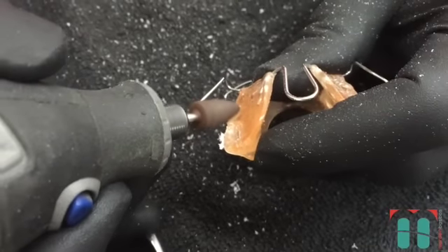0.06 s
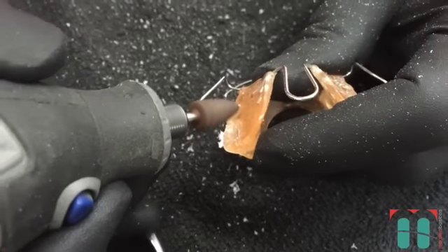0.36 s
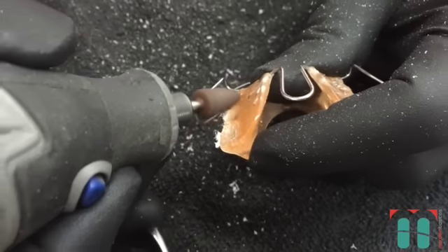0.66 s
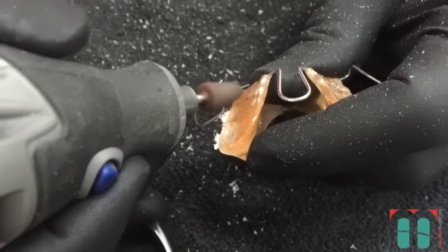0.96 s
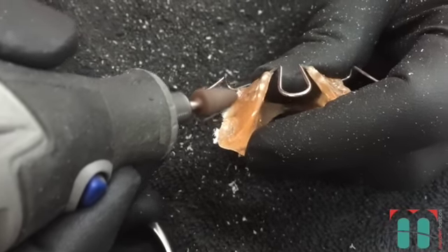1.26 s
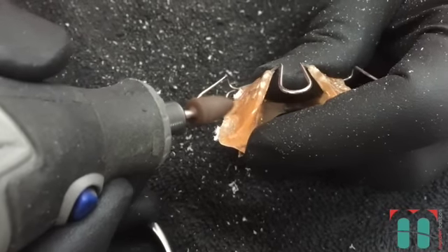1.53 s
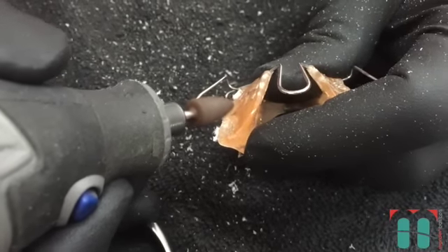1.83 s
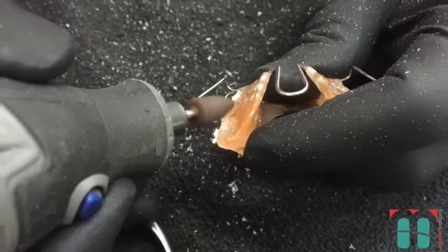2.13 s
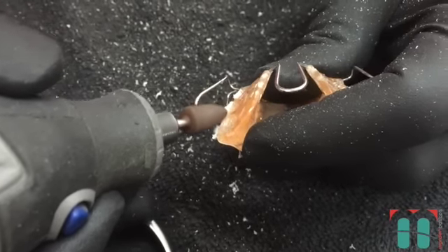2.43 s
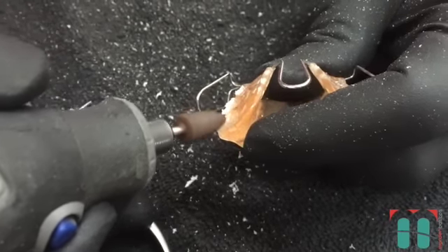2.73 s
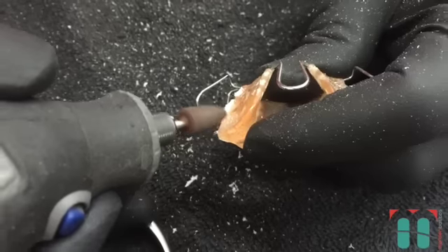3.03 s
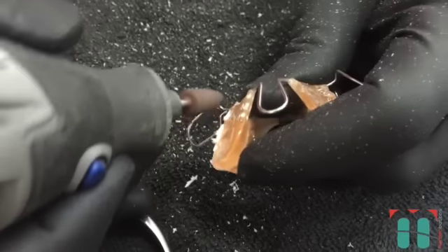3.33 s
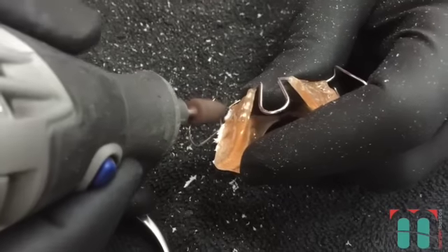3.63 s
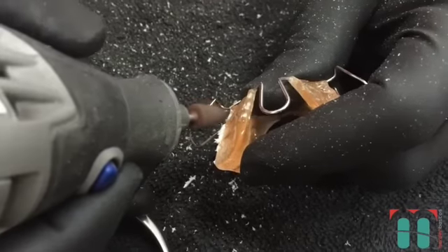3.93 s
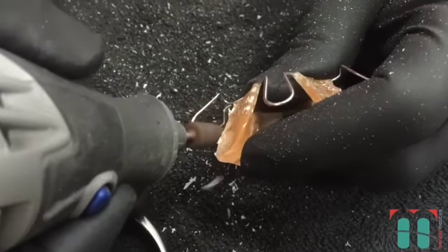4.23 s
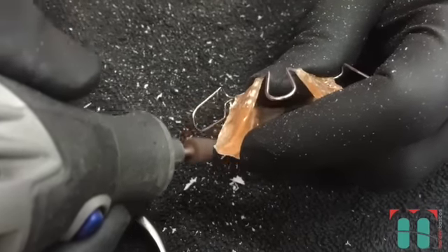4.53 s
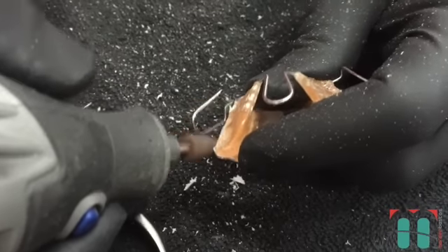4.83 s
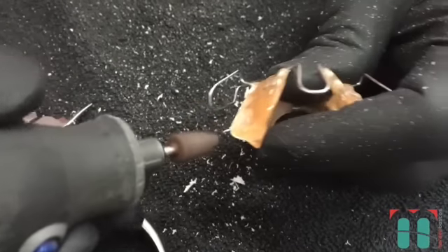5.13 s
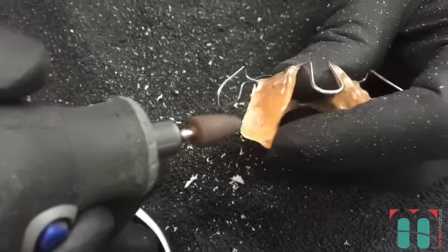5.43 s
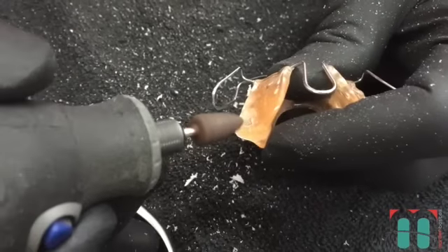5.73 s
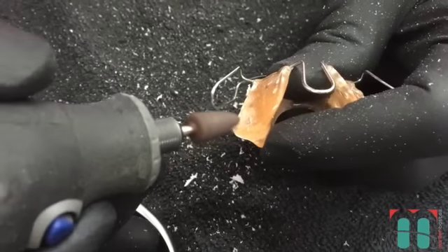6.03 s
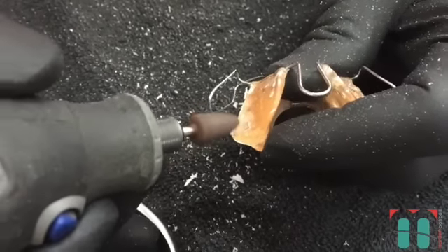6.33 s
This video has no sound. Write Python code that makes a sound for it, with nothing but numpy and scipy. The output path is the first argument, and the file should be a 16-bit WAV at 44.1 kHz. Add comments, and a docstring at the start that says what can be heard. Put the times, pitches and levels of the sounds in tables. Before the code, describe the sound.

A small rotary tool runs close to the microphone for the whole six and a half seconds: a high, steady whine with a motor buzz, a thin fan whistle and hissing air, its pitch sagging slightly under load. Its abrasive stone grinds a hard plastic plate with a gritty, rasping chatter. Quick, uneven presses follow one another through the first three seconds, with brief shrill squeals near 0.2, 1.1 and 1.8 seconds. From about 3.1 to 3.9 seconds the contact lightens to a brighter scrape. Firmer presses return from 4 to 5 seconds, with a cluster of piercing squeals. The grinding eases around 5.4 seconds while the motor keeps whining, then resumes, squealing briefly near 6 and 6.4 seconds. Soft, dull hand bumps come mostly in the last second or so. A faint, low room rumble lies behind the bench.

```python
"""A high, steady whine with a rasping chatter: a small rotary tool grinds a hard plastic plate on a
bench, close to the microphone. The shaft hums at about 29,000 rpm and sags under load, the fan whistles
and blows, and the mains supply makes the motor buzz. The stone strikes the plate once a turn, each press
ringing the modes of that place on the rim, and squeals where it grabs. The hands bump softly, and a
faint room rumble lies behind it all."""
import sys
import numpy as np
from scipy import signal
from scipy.fft import rfft, irfft, next_fast_len
from scipy.io import wavfile
from scipy.ndimage import uniform_filter1d, map_coordinates

SR = 44100
rng = np.random.default_rng(int(sys.argv[2]) if len(sys.argv) > 2 else 0)


def master_out(mix):
    """Clip the mix to full scale and print it as 16-bit PCM to the path in sys.argv[1]."""
    frames = np.transpose(np.atleast_2d(mix))
    ceiling = np.clip(frames, -1, 1)
    pcm = np.round(ceiling * 32767).astype(np.int16)
    wavfile.write(sys.argv[1], SR, pcm)


N = 289737

# Levels in the tables are relative: each source adds its own gain.
# the shaft's speed, sagging under load: (time [s], speed [turns/s])
SHAFT_SPEED = [(0, 475), (.46, 472), (.75, 479), (.98, 482), (1.48, 481.6), (1.85, 476.8), (2.3, 480.5),
               (2.6, 480), (3.3, 488.3), (3.65, 491.5), (3.88, 492), (4.15, 488.5), (4.42, 484.5),
               (4.75, 487), (4.92, 486), (5.3, 490), (5.63, 492), (6.13, 487.6), (6.57, 489.8)]
# hum of the shaft's imbalance: (time [s], level [dB])
SHAFT_HUM = [(0.0, -19), (0.13, -18.5), (1.28, -17.5), (1.35, -15.5), (1.81, -17.5), (3.46, -13.5),
             (3.88, -14), (4.32, -17.5), (4.63, -14.5), (4.87, -17), (5.03, -14), (5.36, -15.5),
             (6.57, -15.5)]
# whistle of the cooling fan's blades: (time [s], level [dB])
FAN_WHISTLE = [(0.0, -16), (1.13, -17), (1.81, -19), (2.1, -17), (3.22, -20.5), (3.44, -16.5),
               (3.68, -18.5), (4.54, -17.5), (4.61, -19), (4.9, -16), (5.07, -25), (5.27, -13),
               (5.53, -15.5), (6.57, -19)]
# side load shakes the housing at 2, 3 and 4 times the shaft's rate: (time [s], level [dB])
HOUSING_2ND = [(0.0, -19), (0.48, -17), (0.6, -32), (0.84, -22), (1.11, -20.5), (3.93, -24), (4.28, -19),
               (4.46, -24.5), (4.79, -20), (5.2, -24.5), (6.4, -22.5), (6.57, -26)]
HOUSING_3RD = [(0.0, -17), (0.03, -18.5), (0.42, -15.5), (0.55, -30), (0.58, -24.5), (0.93, -17),
               (1.9, -17.5), (2.18, -24), (2.25, -18), (3.75, -22), (4.1, -19.5), (4.3, -23), (5.49, -22),
               (6.13, -18), (6.22, -24.5), (6.33, -20), (6.57, -23)]
HOUSING_4TH = [(0, -36), (.4, -25), (.55, -26), (.65, -31), (1.2, -44), (1.78, -39), (1.89, -22),
               (1.99, -40), (2.3, -27.5), (2.95, -26), (3.75, -25), (3.92, -35), (4.18, -23), (4.38, -36),
               (4.55, -25), (6.57, -24.5)]
# tones of the supply ripple beside the shaft orders: (order, lower tone [dB], upper tone [dB])
RIPPLE_SIDEBANDS = [(1, -49.5, -43.5), (2, -30.5, -41.5), (3, -33.5, -28), (4, -43, -33.5), (5, -35, -30.5),
                    (6, -34.5, -62), (7, -37, -33.5), (9, -33, -31), (12, -30, -38.5), (13, -27, -30),
                    (14, -26, -57), (19, -43, -38)]
# the hand presses the stone on: (start [s], end [s], force [dB], place on the rim [wavelengths])
HAND_PRESSES = [(0, 0.093, 0, 1), (.15, .23, 2, 0.35), (.27, 0.427, 6, 0.25), (.42, 0.575, 5.5, 0.19),
                (.62, 0.696, 1, 0.43), (0.732, 0.92, 3, .36), (0.956, 1.135, 2.5, .21),
                (1.16, 1.27, 1.5, .22), (1.29, 1.39, -2.5, 0.68), (1.403, 1.595, 2, 0.44),
                (1.607, 1.82, -2.5, .61), (1.82, 1.9, 2, 0.9), (1.89, 1.98, 4.5, .42),
                (2.03, 2.185, 1.5, 0.21), (2.22, 2.3, 3.5, .42), (2.297, 2.455, -1, 0.84),
                (2.487, 2.61, -4.5, 0.95), (2.677, 2.71, 0, .1), (2.817, 2.927, 0, 0.35),
                (2.914, 3.033, 1.5, 0.49), (3.06, 3.105, 3, 0.17), (3.93, 4.085, 3.5, .46),
                (4.084, 4.342, 2.5, 0.96), (4.32, 4.515, 1.2, .74), (4.53, 4.73, -2.5, 0.93),
                (4.73, 4.85, 0, 1), (4.87, 4.916, -0.5, .71), (4.93, 4.987, -4.5, .99),
                (5.556, 5.76, -1.5, 0.76), (5.77, 5.95, 1, 0.75), (5.964, 6.19, -1.3, 0.89),
                (6.292, 6.41, -2.5, .75)]
# the plate's modes: (frequency [Hz], width [Hz], level [dB], antinode on the rim [wavelengths])
PLATE_MODES = [(2427, 166, -23, 0.013), (2887, 184, -27, 0.3), (3390, 360, -25.5, 0.73)]
# the stone's face rubs the plastic: (time [s], rasp [dB], scrape [dB])
RUB_LEVELS = [(0, -25, -27), (.2, -23.5, -22), (.55, -31.5, -26), (.85, -25, -20.5), (1.8, -22, -21),
              (2.1, -25.5, -25), (2.7, -24.5, -29), (3.2, -29, -18.5), (3.7, -23.5, -16),
              (4.15, -29, -23.5), (4.35, -23, -27), (4.7, -25, -19.5), (5.1, -24, -18.5), (5.45, -31, -33),
              (6.0, -25.5, -22.5), (6.57, -25, -25)]
# the plate's dense upper modes, a rasp and a brighter scrape: (frequency [Hz], level [dB])
RASP_SPECTRUM = [(3400, -6), (3850, 11.5), (4350, 8.5), (4850, 6), (5400, -30)]
SCRAPE_SPECTRUM = [(4900, -42), (5350, -6), (5750, 1.5), (6300, -2.5), (7200, -11), (7850, -11),
                   (8300, -15), (8700, -29), (9300, -11), (12000, -23)]
# the stone grabs and squeals: (centre time [s], length [s], frequency [Hz], width [Hz], level [dB])
STONE_GRABS = [(.19, .07, 5690, 400, -18), (1.11, .1, 13000, 3500, -27), (1.65, .2, 12300, 2500, -26),
               (1.8, .09, 12200, 2000, -21), (1.8, .12, 5730, 400, -22), (4.02, .15, 12500, 4000, -28),
               (4.18, 0.17, 13680, 1000, -21), (4.286, .06, 12400, 4000, -16), (4.44, .1, 15050, 700, -26),
               (4.446, 0.11, 12360, 2000, -19), (4.76, .13, 12200, 1400, -27),
               (4.875, 0.041, 5820, 400, -15), (4.89, .05, 12500, 4500, -17), (6.0, .25, 12000, 2000, -27),
               (6.373, .07, 5850, 900, -17.5)]
# broad hiss around the tool: (time [s], cooling air [dB], abrasion [dB])
HISS_LEVELS = [(0, -18, -21), (.6, -20, -23.5), (.85, -19, -21.5), (1.65, -19, -22.5), (2.65, -17.5, -22),
               (3.35, -18, -22), (4.3, -19, -21.5), (4.55, -19, -22.7), (5.3, -18.5, -23),
               (6.57, -18, -21.5)]
# air from the vents and scratching grit: (frequency [Hz], level [dB])
AIR_SPECTRUM = [(100, -33.5), (260, -21), (520, -12.5), (740, -13), (950, -5.5), (2300, -4.5), (3100, -7),
                (5200, -9), (6400, -1.5), (8200, -3), (9200, -12), (10400, -10.5), (15200, -31)]
GRIT_SPECTRUM = [(1000, -23.5), (3000, -7.5), (5800, -2), (9000, -1), (9900, 0), (10450, -8), (11300, -1.5),
                 (13000, -3), (15200, -3)]
# soft bumps of the hands: (time [s], level [dB])
HAND_BUMPS = [(0.909, -37), (5.369, -32), (5.649, -33), (5.689, -31), (6.319, -23), (6.399, -29),
              (6.479, -24)]
# low rumble of the room behind the tool: (frequency [Hz], level [dB])
ROOM_SPECTRUM = [(20, -24), (45, -9), (70, 3), (130, -1), (250, -2), (600, -24), (2000, -60)]


def motor(angle, shaft_db=3, fan_db=4, blades=18):
    """Close up, imbalance hums once a turn, the housing adds overtones and the fan's blades whistle."""
    out = amp(curves(SHAFT_HUM)[0] + shaft_db) * tone(angle, flutter_db=0.28, drift_rad=0.01)
    out += amp(curves(FAN_WHISTLE)[0] + fan_db) * tone(blades * angle, flutter_db=0.88, drift_rad=0.12)
    for order, levels, gain_db in [(2, HOUSING_2ND, 3), (3, HOUSING_3RD, 4.5), (4, HOUSING_4TH, 3.5)]:
        out += amp(curves(levels)[0] + gain_db) * tone(order * angle, flutter_db=0.83, drift_rad=0.028)
    return out


def mains_buzz(angle, ripple_hz=119.8, flutter_db=0.31):
    """The torque pulses twice a mains cycle and flanks shaft orders with pairs of tones."""
    ripple = 2 * np.pi * ripple_hz * np.arange(N) / SR
    out = np.zeros(N)
    for order, lower_db, upper_db in RIPPLE_SIDEBANDS:
        for side, db in ((-1, lower_db), (1, upper_db)):
            out += amp(db) * np.sin(order * angle + side * ripple + rng.uniform(0, 2 * np.pi))
    return out * amp(flutter_db * wobble(8))


def plate_chatter(turns, rasp_exponent=0.72, scrape_exponent=0.29, tremble_db=1.2, bite_db=0.9):
    """The strikes ring the plate; which modes answer depends on where the stone presses."""
    blows = stone_strikes(turns, jitter_turns=0.005, wander_turns=0.01, spread_db=1.8)
    bite = amp(bite_db * wobble(35))
    force = contact_force()
    rasp_db, scrape_db = curves(RUB_LEVELS)
    out = np.zeros(N)
    for hz, width, db, antinode in PLATE_MODES:
        drive = amp(db + tremble_db * wobble(22)) * contact_force(antinode)
        out += drive * resonate(blows, hz, width)
    out += amp(rasp_db) * force ** rasp_exponent * dense_modes(blows, RASP_SPECTRUM)
    out += amp(scrape_db) * force ** scrape_exponent * dense_modes(blows, SCRAPE_SPECTRUM)
    return bite * out


def stone_strikes(turns, jitter_turns, wander_turns, spread_db):
    """One impulse a turn, where the stone's high spot meets the plate; the contact point creeps."""
    whole_turns = np.arange(1, int(turns[-1]))
    timing, size = rng.standard_normal((len(whole_turns), 2)).T
    contact = turns + wander_turns * wobble(25)
    at = np.interp(whole_turns + jitter_turns * timing, contact, np.arange(N))
    # a windowed sinc places each strike between samples
    taps = at.astype(int)[:, None] + np.arange(-7, 9)
    offset = taps - at[:, None]
    pulses = np.sinc(offset) * np.cos(np.pi * offset / 16) ** 2
    pulses *= amp(spread_db * size[:, None])
    return np.bincount(np.clip(taps, 0, N - 1).ravel(), pulses.ravel(), N)


def contact_force(antinode=None, catch_s=0.018, release_s=0.03, graze_db=-7, mode_shape_db=3.5):
    """Each press catches, holds and eases to a graze; a mode feels it most at its antinode."""
    t = np.arange(N) / SR
    force = np.full(N, amp(graze_db))
    for start, end, db, place in HAND_PRESSES:
        if antinode is not None:
            db = db + mode_shape_db * np.cos(2 * np.pi * (place - antinode))
        held = np.clip(np.minimum((t - start) / catch_s, (end - t) / release_s) + 0.5, 0, 1)
        force = np.maximum(force, amp(db) * held)
    return force


def dense_modes(blows, spectrum):
    """Many close modes at a steady total level: the strongest overtone changes as the stone moves."""
    paths = sum(wobble(9) * unit(scatter(blows, t60=0.005)) for _ in range(6))
    ring = coloured(paths, spectrum)
    power = np.abs(uniform_filter1d(ring ** 2, SR // 20))
    return ring / np.sqrt(power + 1e-6)


def scatter(x, t60):
    """Short reflections between hands, plate and bench smear each impact."""
    t = np.arange(SR // 20) / SR
    reflections = rng.standard_normal(len(t)) * amp(-60 * t / t60)
    return signal.fftconvolve(x, reflections)[:N]


def stone_squeals(turns):
    """Where the stone grabs, every turn kicks the same shrill resonance for a moment."""
    t = np.arange(N) / SR
    slips = stone_strikes(turns, jitter_turns=0.003, wander_turns=0.005, spread_db=2.5)
    out = np.zeros(N)
    for centre, length, hz, width, db in STONE_GRABS:
        grip = np.exp(-((t - centre) / (length / 2)) ** 4 / 2)
        out += amp(db) * grip * resonate(scatter(slips, t60=0.0085), hz, width)
    return out


def air_and_grit(angle, air_gain_db=2, grit_gain_db=6, pulsing=0.18, grain_db=1, waver_db=1.07):
    """Air hisses from the vents; the grit's scratch pulses once a turn and wavers at random in level."""
    air_db, grit_db = curves(HISS_LEVELS)
    vents = coloured(rng.standard_normal(N) * (1 + 0.1 * np.cos(angle)), AIR_SPECTRUM)
    scratches = rng.standard_normal(N) * (1 + pulsing * np.cos(angle)) * amp(grain_db * wobble(1500))
    abrasion = amp(grit_db + grit_gain_db + waver_db * wobble(11))
    return amp(air_db + air_gain_db) * vents + abrasion * coloured(scratches, GRIT_SPECTRUM)


def hand_bumps(gain_db=-4, half_width_s=0.019):
    """Each soft push of a hand gives a short dull thud near the microphone."""
    t = np.arange(N) / SR
    push = sum(amp(db + gain_db) * np.exp(-((t - at) / half_width_s) ** 2) for at, db in HAND_BUMPS)
    thud_spectrum = [(25, -22), (60, -5), (130, -4), (190, -12.5), (350, -13), (900, -57)]
    return push * coloured(rng.standard_normal(N), thud_spectrum)


def room_tone(level_db=-49):
    """The room rumbles faintly behind the bench."""
    return amp(level_db) * coloured(rng.standard_normal(N), ROOM_SPECTRUM)


def amp(db):
    """Decibels to gain."""
    return 10 ** (np.asarray(db) / 20)


def unit(x):
    """x at rms 1."""
    return x / np.sqrt(np.mean(x ** 2) + 1e-20)


def curves(rows):
    """One value per sample for each column after the time."""
    times, *columns = np.transpose(rows)
    return [np.interp(np.arange(N) / SR, times, column) for column in columns]


def wobble(rate):
    """A smooth random curve, rate knots a second."""
    return map_coordinates(rng.standard_normal(int(N * rate / SR) + 4), [np.arange(N) * rate / SR])


def tone(angle, flutter_db, drift_rad):
    """A sine that trembles a little in level and phase."""
    level = amp(flutter_db * wobble(45))
    return level * np.sin(angle + drift_rad * wobble(24) + rng.uniform(0, 2 * np.pi))


def filtered(x, response):
    """x through a complex frequency response."""
    size = next_fast_len(N + SR // 4)
    return irfft(rfft(x, size) * response(np.fft.rfftfreq(size, 1 / SR)), size)[..., :N]


def coloured(x, spectrum):
    """x through a spectrum of (frequency [Hz], level [dB]), at rms 1."""
    hz, db = np.transpose(spectrum)
    return unit(filtered(x, lambda f: amp(np.interp(np.log(f + 1), np.log(hz), db))))


def resonate(x, hz, width):
    """x through one steep resonance, at rms 1."""
    return unit(filtered(x, lambda f: (1j * f * width / (hz ** 2 - f ** 2 + 1j * f * width)) ** 2))


def scene():
    """One close microphone feeds both channels; the turning shaft times the tool and the plate."""
    turns = np.cumsum(curves(SHAFT_SPEED)[0]) / SR
    angle = 2 * np.pi * turns
    room = room_tone()
    whine = motor(angle) + mains_buzz(angle)
    grinding = plate_chatter(turns) + stone_squeals(turns)
    mono = whine + grinding + air_and_grit(angle) + hand_bumps() + room
    return np.array([mono, mono])


def record(dry, ceiling=1.02, knee=7, top_hz=15380):
    """The recorder rounds off the highest peaks and keeps nothing above its band limit."""
    rounded = dry / (1 + np.abs(dry / ceiling) ** knee) ** (1 / knee)
    return filtered(rounded, lambda hz: hz < top_hz)


dry = scene()
out = record(dry)
master_out(out)
```